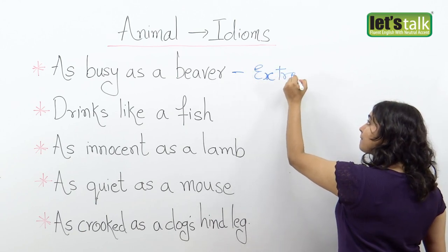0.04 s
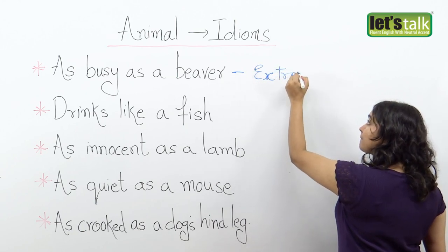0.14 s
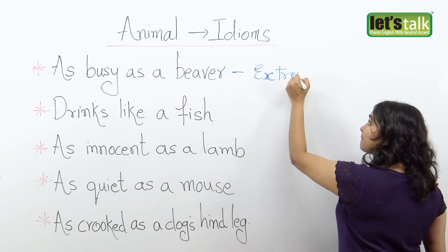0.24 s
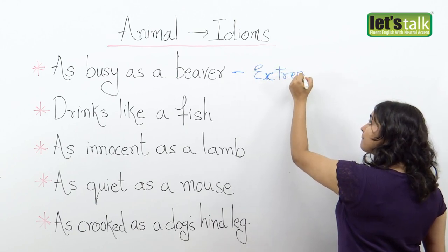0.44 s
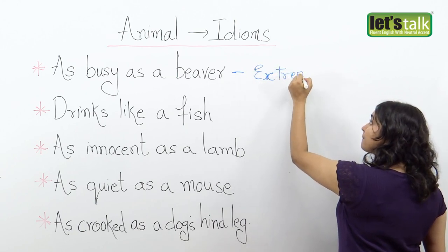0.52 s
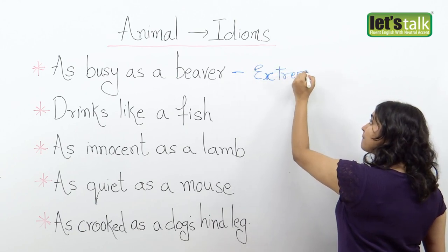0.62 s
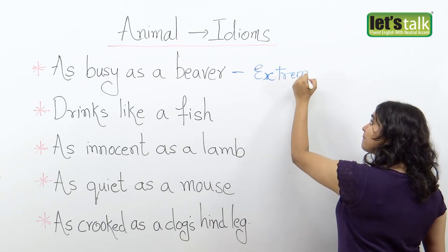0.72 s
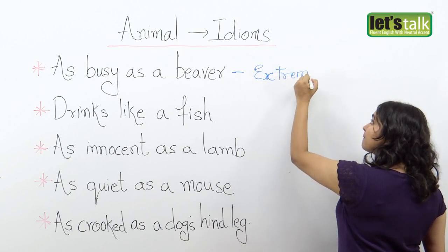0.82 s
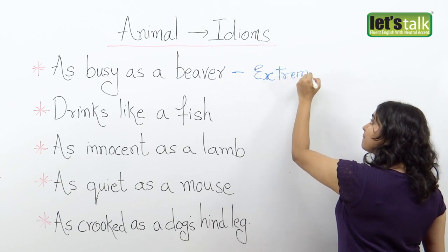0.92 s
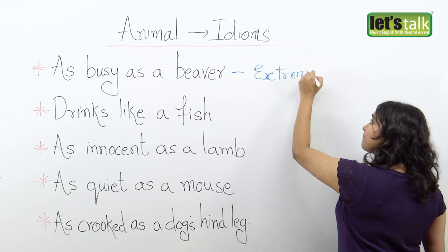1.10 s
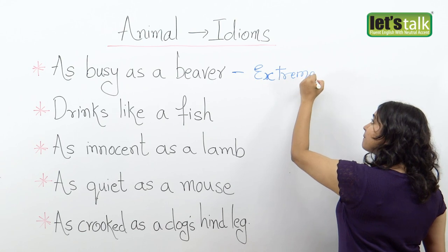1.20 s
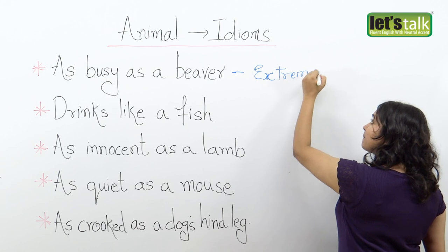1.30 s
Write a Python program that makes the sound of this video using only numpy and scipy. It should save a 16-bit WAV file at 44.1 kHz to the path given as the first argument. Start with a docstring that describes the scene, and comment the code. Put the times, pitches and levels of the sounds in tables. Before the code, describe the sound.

A felt-tip marker writes on a whiteboard, starting with a soft scratchy stroke. At about 0.25 seconds the tip lands with a firm, low thump, followed by rasping, swishing strokes and a faint bump near 0.6. After a brief pause, a muffled thump at 1 second starts more strokes, with a faint high whistle around 1.2. Ventilation hums quietly in the classroom throughout.

```python
"""A felt-tip marker writes a few letters on a wall-mounted whiteboard in a quiet classroom.
Dragging felt slips fibre by fibre, rasping through the marker's fixed resonances, with a broad
swish where the hand moves fast, short hollow catches and one fuzzy whistle. Each landing of the
tip thumps the panel, which booms in its low modes. Ventilation hums faintly underneath."""
import sys
import numpy as np
from scipy import signal
from scipy.fft import rfft, irfft
from scipy.io import wavfile
from scipy.ndimage import map_coordinates

SR = 44100
rng = np.random.default_rng(int(sys.argv[2]) if len(sys.argv) > 2 else 0)


def inscribe(sig):
    """Save sig as 16-bit PCM at rate SR to the path in sys.argv[1].

    A 1-D sig is mono; a 2-D sig holds one channel per row.
    Samples are clipped to [-1, 1] before scaling.
    """
    pcm = np.round(np.clip(np.atleast_2d(sig).T, -1, 1) * 32767)
    wavfile.write(sys.argv[1], SR, pcm.astype(np.int16))


N = 59535


def drag(rise_s=0.0047, grip_db=1, grip_s=0.0085):
    """Each stroke grips, holds and lifts; the slipping felt rasps and rings the marker."""
    # strokes of the felt (start [s], length [s], level [dB], release [s], extra ring [dB])
    strokes = [(-.03, 0.11, -57, 0.034, 2.5), (0.224, 0.0047, -72, 0.0035, 11),
               (0.24, 0.0056, -75, 0.0086, 15.5), (0.272, 0.064, -62, 0.011, 6),
               (0.374, 0.21, -60.5, 0.0099, 3.5), (0.62, 0.16, -58, 0.013, 0.5),
               (0.775, 0.056, -59, 0.029, 4.5), (1.015, .02, -68.5, .012, 9.5),
               (1.045, 0.054, -56.5, 0.0097, -7), (1.105, 0.048, -62.5, .012, 5.5),
               (1.148, 0.15, -57.5, 0.019, -1.5)]
    # tone curve of the rasp (frequency [Hz], relative level [dB])
    rasp = [(400, 11.5), (900, -3.5), (1900, -3.5), (3100, -31), (4700, 5), (5400, -1.5), (6100, 0),
            (8200, 5), (9100, -3), (9900, 8), (11000, 4.5), (12000, -3), (13200, 0.5), (15500, -15.5)]
    # resonances of the marker (frequency [Hz], width [Hz], level [dB])
    marker = [(2527, 570, -16), (3725, 465, -7.5), (4350, 380, -18), (10250, 830, -22.5)]
    contact, ringing = np.zeros(N), np.zeros(N)
    for start, length, db, release, ring_db in strokes:
        attack = np.minimum(since(start) / rise_s, 1)
        lift = np.exp(-since(start + length) / release)
        grip = amp(grip_db * np.exp(-since(start) / grip_s))
        press = amp(db) * attack * lift * grip
        contact = np.hypot(contact, press)  # overlapping strokes add in power
        ringing = np.hypot(ringing, press * amp(ring_db))
    slips = fibres()
    body = sum(amp(db) * shaped(fibres(), resonance(hz, width)) for hz, width, db in marker)
    return contact * shaped(slips, colour(rasp)) + ringing * body


def fibres(slips_per_s=8200, spread_db=2.5, chatter_db=0.45, chatter_hz=109):
    """Dense tiny slips of felt fibres, their level roughened by the chatter of the tip."""
    slips = (rng.random(N) < slips_per_s / SR) * rng.choice([-1, 1], N)
    sizes = amp(spread_db * np.minimum(rng.exponential(1, N), 4))
    chatter = noise(resonance(0, 2 * chatter_hz))
    return slips * sizes * amp(chatter_db * chatter)


def swishes(skirt_db=-16):
    """Fast sweeps of the hand: swells of hiss, each coloured by its own angle of the tip."""
    # fast parts of the letters (time [s], half length [s], level [dB], centre [Hz], width [Hz])
    sweeps = [(0.104, 0.026, -63, 6940, 1510), (0.31, 0.018, -63, 9100, 2600),
              (0.47, 0.027, -64, 11300, 2020), (0.49, 0.048, -62, 6700, 800),
              (0.714, 0.021, -59.5, 7100, 1100), (0.815, 0.019, -57, 8750, 1400),
              (1.069, 0.02, -57, 7440, 2000), (1.095, .018, -61, 7150, 1860),
              (1.159, .035, -60.5, 6940, 2400), (1.26, 0.051, -57.5, 7800, 2400),
              (1.276, 0.037, -57, 5600, 910)]
    out = np.zeros(N)
    for time, half_length, db, hz, width in sweeps:
        band = np.exp(-.5 * ((bins() - hz) / width) ** 2)
        skirt = amp(skirt_db) * resonance(hz, 2 * hz)
        out += amp(db) * swell(time, half_length) * shaped(fibres(), band + skirt)
    return out


def catches(width_hz=380):
    """The felt catches and excites one resonance of the marker: short hollow scrapes."""
    # catches of the felt (time [s], half length [s], level [dB], resonance [Hz])
    scrapes = [(0.051, 0.036, -62, 3800), (0.329, .011, -66, 4330), (0.4, 0.015, -64, 3760),
               (0.46, 0.05, -75, 2560), (0.489, 0.0067, -61, 2560), (0.568, 0.026, -64, 4440),
               (0.593, 0.019, -69.5, 2500), (.725, 0.031, -68.5, 2600), (0.805, 0.03, -65, 4450),
               (1.084, 0.038, -67.5, 2540), (1.297, 0.032, -68.5, 2480), (1.23, .035, -62.5, 10040)]
    return sum(amp(db) * swell(time, half_length) * shaped(fibres(), resonance(hz, width_hz))
               for time, half_length, db, hz in scrapes)


def whistle(time=1.215, half_length=.055, top_hz=13300, sag_hz=1400, width_hz=480, level_db=-67):
    """A fuzzy high tone whose pitch arches as the tip speeds up and slows."""
    offset = (np.arange(N) / SR - time) / half_length
    hz = top_hz - sag_hz * np.minimum(offset ** 2, 2)
    tone = np.sin(2 * np.pi * np.cumsum(hz) / SR)
    fuzz = noise(resonance(0, width_hz))
    return amp(level_db) * swell(time, half_length) * unit(fuzz * tone)


def hand_reflections(x, count=4, delay_s=.0009, sway_s=.00009, sway_hz=6, gain=.27):
    """Drifting reflections off the moving hand and arm ripple the colour of the friction."""
    out = x
    for k in range(1, count + 1):
        delay = delay_s * (1 + k * rng.random()) + sway_s * noise(resonance(0, 2 * sway_hz))
        out = out + gain * map_coordinates(x, [np.arange(N) - delay * SR], order=3)
    return out / np.sqrt(1 + count * gain ** 2)


def taps(bass_hz=120):
    """The tip lands on the board three times: a firm thump, a faint bassy bump and a muffled thump."""
    # landings of the tip (time [s], level [dB], extra bass [dB], treble cutoff [Hz])
    landings = [(.2406, -0.37, 1.5, 1500), (0.6211, -21.5, 15.5, 2480), (0.9821, -3, 4, 534)]
    out = np.zeros(N)
    for start, db, bass_db, cutoff_hz in landings:
        t = since(start)
        hit = thump(start) + knock(t) + board_ring(t) + boom(t)
        low_shelf = amp(bass_db / (1 + (bins() / bass_hz) ** 6))
        lowpass = 1 / np.sqrt(1 + (bins() / cutoff_hz) ** 6)
        out += amp(db) * irfft(rfft(hit) * low_shelf * lowpass, N)
    return out


def thump(start, hz=239, peak_s=.0059, level_db=-19.5):
    """A few swings of the panel swell and die, with early reflections close behind."""
    # early reflections of the thump (delay [s], signed gain [ratio])
    echoes = [(.0074, -.7), (.0113, .35), (.0146, .59), (.018, -.52), (.0313, -.32)]
    out = np.zeros(N)
    for delay, gain in [(0, 1), *echoes]:
        t = since(start + delay)
        envelope = (t / peak_s * np.exp(1 - t / peak_s)) ** 3
        out += gain * envelope * np.sin(2 * np.pi * hz * t)
    return amp(level_db) * out


def knock(t):
    """The dry knock of the tip itself: quickly damped modes."""
    # modes of the tip (frequency [Hz], level [dB], t60 [s])
    modes = [(576, -45, 0.021), (702, -50.5, 0.051), (870, -60, .025)]
    return sum(amp(db) * decay(t, t60) * np.sin(2 * np.pi * hz * t) for hz, db, t60 in modes)


def board_ring(t, rise_s=.002):
    """The struck panel rings on in its low modes."""
    # modes of the board (frequency [Hz], level [dB], t60 [s], direction of first swing [sign])
    modes = [(42, -48, .7, -1), (54, -48.5, .7, -1), (68.2, -42, .75, 1), (83.8, -39, .75, 1),
             (87.4, -41.3, .75, 1), (99.7, -33, .1, -1), (110.8, -47, .7, -1), (189.6, -29.5, .18, 1),
             (212.5, -33.5, .333, -1), (222.9, -36.4, .35, 1), (258.2, -30.4, .24, 1),
             (276.7, -30.2, .214, 1), (299.7, -50, .6, -1), (362.4, -28.2, .17, -1), (415, -52, .3, 1),
             (615, -48, .15, 1)]
    ring = sum(np.sign(side) * amp(db) * decay(t, t60) * np.sin(2 * np.pi * hz * t)
               for hz, db, t60, side in modes)
    return ring * (1 - np.exp(-t / rise_s))


def boom(t, level_db=-40, t60=0.57, rise_s=0.0085):
    """Board and room bloom into a diffuse low boom after a landing."""
    # tone curve of the boom (frequency [Hz], relative level [dB])
    curve = [(20, -20), (35, -3), (70, -3), (150, 9), (330, 3.5), (490, -1.5), (650, -15.5), (900, -24),
             (1500, -44), (4000, -62)]
    return amp(level_db) * noise(colour(curve)) * decay(t, t60) * (1 - np.exp(-t / rise_s))


def reverb(x, level_db=-10, t60=0.34):
    """Short, faint reverberation of the classroom."""
    tail = rng.standard_normal(N) * decay(since(0), t60)
    return amp(level_db) * signal.fftconvolve(x, tail / np.linalg.norm(tail))[:N]


def room_tone(air_db=-53.5):
    """A bed of still air and microphone hiss under a wavering ventilation hum."""
    # noise bands of the ventilation (frequency [Hz], width [Hz], level [dB])
    hum_bands = [(148.5, 10, -69), (199.8, 7.8, -68.5), (290, 28, -61)]
    # tone curve of air and hiss (frequency [Hz], relative level [dB])
    air = [(15, -5), (40, -6), (70, 2.5), (110, -5.5), (230, -19), (320, -12.5), (480, -22.5), (900, -20.5),
           (2000, -32), (5000, -38), (15000, -46)]
    hum = sum(amp(db) * noise(resonance(hz, width)) for hz, width, db in hum_bands)
    return hum + amp(air_db) * noise(colour(air))


def amp(db):
    """Decibels to gain."""
    return 10 ** (np.asarray(db) / 20)


def unit(x):
    """Scales to rms 1."""
    return x / np.sqrt(np.mean(x ** 2) + 1e-20)


def bins():
    """Frequencies of the full-length spectrum."""
    return np.fft.rfftfreq(N, 1 / SR)


def shaped(x, gain):
    """Filters x by a gain per frequency, to rms 1."""
    return unit(irfft(rfft(x) * gain, N))


def noise(gain):
    """Noise coloured by a gain per frequency, at rms 1."""
    return shaped(rng.standard_normal(N), gain)


def colour(points):
    """Gain per frequency from a tone curve."""
    hz, db = np.transpose(points)
    return amp(np.interp(np.log(bins() + 1), np.log(hz), db))


def resonance(hz, width):
    """Gain per frequency of a steep resonance; a lowpass when centred on 0 Hz."""
    return 1 / (1 + (2 * (bins() - hz) / width) ** 2)


def since(start):
    """Seconds since start, zero before it."""
    return np.maximum(np.arange(N) / SR - start, 0)


def decay(t, t60):
    """Dies by 60 dB in t60."""
    return np.exp(-np.log(1000) * t / t60)


def swell(centre, half_length):
    """A rounded rise and fall."""
    return np.exp(-.5 * ((np.arange(N) / SR - centre) / half_length) ** 4)


def scene():
    """Felt friction with its reverb and taps on the board over room tone, in mono."""
    bed = room_tone()
    hits = taps()
    felt = hand_reflections(drag() + swishes()) + catches() + whistle()
    return (felt + reverb(felt) + hits + bed)[None]


def record(dry):
    """A steep lowpass trims the very top of the treble."""
    cutoff_hz = 15600
    lowpass = signal.firwin(1023, cutoff_hz, window=("kaiser", 9), fs=SR)
    return signal.oaconvolve(dry, lowpass[None], "same")


dry = scene()
out = record(dry)
inscribe(out)
```